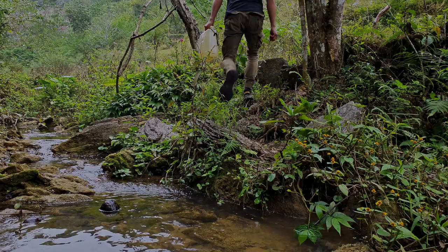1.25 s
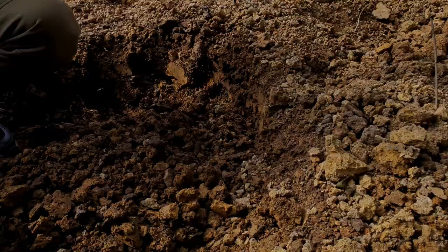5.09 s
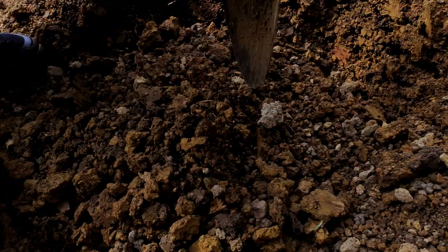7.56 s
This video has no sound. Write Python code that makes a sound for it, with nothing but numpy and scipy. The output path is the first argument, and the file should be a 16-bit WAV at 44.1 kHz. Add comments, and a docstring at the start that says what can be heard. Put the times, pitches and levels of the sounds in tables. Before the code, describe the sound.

A stream trickles as someone walks through undergrowth with a knocking plastic can; then a pole crunches into gritty ground six times.

```python
"""Water trickles close by, briefly over a deep drone, as someone carries an empty plastic can up a stream
bank: feet thump, leaves brush past, the hollow can knocks and a far bird whistles.
Then, on a quiet dry slope, a wooden pole is jabbed six times into stony soil: grit crunches, stones
crack and ring the wood, crumbs trickle back. Light wind rumbles on the microphone in both places."""
import sys
import numpy as np
from scipy import signal
from scipy.fft import rfft, irfft
from scipy.io import wavfile

SR = 44100
rng = np.random.default_rng(int(sys.argv[2]) if len(sys.argv) > 2 else 0)


def pcm_store(signal):
    """Save signal as 16-bit PCM."""
    levels = np.round(np.clip(np.atleast_2d(signal), -1, 1) * 32767)
    wavfile.write(sys.argv[1], SR, levels.astype(np.int16).T)


N = 387198
TIME = np.arange(N) / SR
BANK_END_S = 5.16

# Strokes of the pole. Each row: start and push length in seconds; grit, thud, left over right,
# first contact and caving in dB; settling time of the soil in seconds.
JABS = [(5.311, 0.026, -33.5, -37, -0.5, -25.5, -53, 0.11),
        (6.127, 0.032, -34.5, -35, 4.5, -24.5, -53.5, 0.24),
        (7.02, 0.043, -35.5, -34.5, 4, -36.5, -49, 0.092), (7.801, 0.038, -40, -45.5, 13, -20.5, -39, .008),
        (8.175, .041, -39, -44, 3, -30.5, -32, 0.0054), (8.521, 0.033, -38.5, -44, 1, -44, -41.5, .01)]
# The sharp edge of a crack. Each row: frequency in Hz, level in dB.
EDGE_SPECTRUM = [(2000, -22), (5000, -3), (9000, -0.5), (13000, 1), (16000, -11)]
# Wind on the microphone. Each row: frequency in Hz, level in dB.
WIND_SPECTRUM = [(22, -15.5), (46, -8.5), (75, -2), (110, -14.5), (180, -28), (400, -45), (1500, -68.5)]


def from_db(db):
    """Decibels to gain."""
    return 10 ** (np.asarray(db) / 20)


def rms_one(x):
    """Scale to unit power."""
    return x / np.sqrt(np.mean(x ** 2) + 1e-20)


def level(rows):
    """Gain over time from rows of seconds and dB."""
    return from_db(np.interp(TIME, *np.transpose(rows)))


def until(end):
    """Full gain, then a quick fade that closes at `end` seconds."""
    return np.clip((end - TIME) / .006, 0, 1)


def panned(db):
    """Left and right gains, `db` apart."""
    return from_db([[db / 2], [-db / 2]])


def response(points, size=4096):
    """Causal impulse response from rows of Hz and dB, by folding the cepstrum."""
    hz, db = np.transpose(points)
    log_hz = np.log(np.fft.rfftfreq(size, 1 / SR) + 1)
    log_gain = np.log(from_db(np.interp(log_hz, np.log(hz), db)))
    cepstrum = irfft(log_gain)[:size // 2]
    cepstrum[1:] *= 2
    return irfft(np.exp(rfft(cepstrum, size)))


def through(x, impulse):
    """Filter along time."""
    return signal.oaconvolve(np.atleast_2d(x), impulse[None], axes=1)[:, :N]


def colour(x, spectrum):
    """Shape white input by a spectrum, keeping its power."""
    impulse = response(spectrum)
    return through(x, impulse / np.linalg.norm(impulse))


def stereo_noise():
    """Noise that reaches both sides of the microphone alike in the bass, unrelated in the treble."""
    # Stereo width. Each row: frequency in Hz, side over mid in dB.
    width = [(50, -3.5), (200, -8.5), (500, -2.5), (1500, 1.5), (4000, -1), (8000, 1), (16000, 1.5)]
    mid, side = rng.standard_normal((2, N))
    return rms_one(mid + through(side, response(width)) * [[1], [-1]])


def drift(per_s):
    """Random wander with a spread near one."""
    knots = rng.standard_normal(N // 40)
    return np.interp(TIME * per_s, np.arange(len(knots)), knots)


def burst(start, hold, t60, rise):
    """Envelope that rises, holds and dies away; times in seconds."""
    out, first = np.zeros(N), int(start * SR)
    t = TIME[:min(N - first, SR // 2)]
    out[first:first + len(t)] = (1 - np.exp(-t / rise)) * from_db(-60 * np.maximum(t - hold, 0) / t60)
    return out


def swells(rows, fall_ratio):
    """Gain of overlapping swells, each taking `fall_ratio` times as long to fall as to rise."""
    power = np.zeros(N)
    for peak, db, width in rows:
        away = np.maximum(peak - TIME, (TIME - peak) / fall_ratio) / width
        power += (from_db(db) * np.exp(-np.minimum(away, 20))) ** 2
    return np.sqrt(power)


def ring(x, hz, t60):
    """A mode that a unit click sets ringing at height one."""
    radius, angle = from_db(-60 / (t60 * SR)), 2 * np.pi * hz / SR
    return signal.lfilter([0, np.sin(angle)], [1, -2 * radius * np.cos(angle), radius ** 2], x + 1e-18)


def grains(per_s, spread_db, grain_s, smooth):
    """Tiny fractures of uneven size, each a short puff of noise, over a smooth share of friction."""
    sizes = from_db(spread_db * np.minimum(rng.exponential(1, N), 4))
    born = rng.random(N) < per_s / SR
    energy = signal.lfilter([1], [1, -np.exp(-1 / (grain_s * SR))], (sizes * born) ** 2 + 1e-18)
    return rms_one(stereo_noise() * np.sqrt(energy / energy.mean() + smooth))


def pings(span, per_s, spectrum, cycles, glide, spread_db, pan_spread_db):
    """Small bodies ring briefly at random times and pitches; unit power within the span."""
    out, (start, end) = np.zeros((2, N + SR)), span
    pitches, levels = np.transpose(spectrum)
    draws = rng.random((4000, 5))[:int(per_s * (end - start))]
    for when, pitch, size, side, damping in draws:
        hz = pitches[0] * (pitches[-1] / pitches[0]) ** pitch
        t60 = cycles * (.5 + damping) / hz
        t = TIME[:int(min(t60, .5) * SR)]
        first = int((start + when * (end - start)) * SR)
        db = np.interp(hz, pitches, levels) + spread_db * size ** 2 - 60 * t / t60
        swing = np.sin(2 * np.pi * hz * t * (1 + glide * t / t60)) * (1 - np.exp(-t * hz * 2))
        out[:, first:first + len(t)] += panned(pan_spread_db * (2 * side - 1)) * from_db(db) * swing
    return rms_one(out[:, :N]) * np.sqrt((end - start) * SR / N)


def knocks(rows, cycles, rattle_db):
    """Each contact swings for a few cycles and leaves a short rattle around the same pitch."""
    out, noise = np.zeros((2, N + SR)), stereo_noise()
    t = TIME[:SR // 4]
    for k, (start, db, hz, t60, pan_db) in enumerate(rows):
        swing = np.sin(2 * np.pi * hz * t) * from_db(-60 * t * hz / cycles)
        band = signal.butter(2, [hz * 0.49, hz * 1.27], "band", fs=SR, output="sos")
        rattle = rms_one(signal.sosfilt(band, noise[:, k * len(t):(k + 1) * len(t)]))
        rattle *= from_db(-60 * t / t60)
        sound = from_db(db) * panned(pan_db) * (swing + from_db(rattle_db) * rattle)
        # the quieter side hears it slightly later
        for side, arrival in enumerate((start, start + pan_db * 4e-5)):
            first = int(arrival * SR)
            out[side, first:first + len(t)] += sound[side]
    return out[:, :N]


def pole():
    """The tip crushes grit and clinks pebbles; the soil packs, stops it with a thump and caves in."""
    # Stones cracking under the tip, and pebbles ticking after the stroke.
    # Each row: start in seconds, level in dB, t60 in seconds, edge in dB.
    cracks_and_ticks = [(5.333, -19.5, 0.052, -31), (6.158, -29.5, 0.044, -19), (6.183, -46, .012, 5),
                        (6.249, -54, .008, 11), (6.342, -58.5, 0.015, 21), (7.041, -23.5, 0.039, 6),
                        (7.057, -19.5, 0.042, -15), (7.824, -19.5, 0.037, 4), (8.201, -30.5, .014, 10),
                        (8.213, -28.5, 0.028, -22), (8.538, -38, 0.059, 9), (8.68, -42, 0.026, -12)]
    # The tip grazing the ground. Each row: start and length in seconds, grit level in dB.
    grazes = [(8.276, 0.0072, -44.5), (8.501, 0.01, -52.5)]
    # Resonances of the pole and of packed soil. Each row: pitch in Hz, t60 in seconds, level in dB.
    wood_modes = [(544, 0.012, -16), (1340, 0.012, -16), (1610, 0.021, -14.5), (2310, 0.022, -12),
                  (3130, 0.032, -13.5), (5260, 0.033, -22)]
    ground_modes = [(117, 0.16, -3.5), (210, 0.06, 5), (265, 0.048, 3), (530, 0.017, 4)]
    # Grit, pebbles, soil packing and soil caving in. Each row: frequency in Hz, level in dB.
    grit_spectrum = [(150, -7), (400, 2), (800, -1.5), (1400, -1.5), (2500, 5), (4800, 4), (6500, -1),
                     (9000, 1.5), (13000, -1.5), (16000, -11.5)]
    pebble_spectrum = [(450, -12), (1000, -3), (2000, 8), (4000, -9), (9000, 5)]
    thud_spectrum = [(25, -9.5), (60, -32), (130, -18.5), (280, 4), (500, -13), (900, -11), (2500, -19.5)]
    caving_spectrum = [(90, -18.5), (180, 1.5), (350, -2.5), (600, 0), (900, -11), (2000, -33)]
    crush, contacts = np.zeros((2, N)), []
    packing, stops, caving, cracks, edges = np.zeros((5, N))
    for start, push, grit_db, thud_db, pan_db, contact_db, caving_db, _ in JABS:
        # the soil packs ever tighter, so crunch and thud grow along the push
        to_go = 1 - np.clip((TIME - start) / push, 0, 1)
        crush += from_db(grit_db - 3 * to_go) * panned(pan_db) * burst(start, push, t60=.051, rise=.0015)
        packing += from_db(thud_db + 1.05 - 2.3 * to_go) * burst(start, push + .0011, t60=.13, rise=.002)
        stops[int((start + push) * SR)] = from_db(thud_db)
        caving += from_db(caving_db) * burst(start + .8 * push, hold=.012, t60=.1, rise=.003)
        contacts.append((start + .002, contact_db, .021, -6.5))   # one more crack as the crust breaks
    for start, length, grit_db in grazes:
        crush += from_db(grit_db) * burst(start, length, t60=.062, rise=.0026)
    for start, db, t60, edge_db in contacts + list(cracks_and_ticks):
        crack = from_db(db) * burst(start, 0, t60, rise=.0006)
        cracks += crack
        edges += from_db(edge_db) * crack
    force = crush * grains(per_s=1400, spread_db=3.5, grain_s=.0003, smooth=.19)
    force += from_db(-6.5) * cracks * stereo_noise()
    clinks = pings((BANK_END_S, N / SR), 900, pebble_spectrum,
                   cycles=59, glide=0, spread_db=12, pan_spread_db=1)
    # the same force rings the wood; each mode is scaled to its share of the power
    wood = sum(from_db(db) * ring(force, hz, t60) * np.sqrt(4 * np.log(1000) / (t60 * SR))
               for hz, t60, db in wood_modes)
    crunch = from_db(3) * colour(force, grit_spectrum) + colour(edges * stereo_noise(), EDGE_SPECTRUM)
    crunch += wood + from_db(-6.5) * (crush + cracks) * clinks
    thump = sum(from_db(db) * ring(stops, hz, t60) for hz, t60, db in ground_modes)
    earth = packing * colour(stereo_noise(), thud_spectrum)
    earth += caving * colour(stereo_noise(), caving_spectrum)
    return crunch + slope_scatter(crunch, t60=.07, wet_db=-19) + earth + thump


def slope_scatter(x, t60, wet_db):
    """The rough slope throws a thin, short tail back to the microphone."""
    tail = rng.standard_normal((2, SR // 2)) * from_db(-60 * TIME[:SR // 2] / t60)
    tail /= np.linalg.norm(tail, axis=1, keepdims=True)
    return from_db(wet_db) * signal.oaconvolve(x, tail, axes=1)[:, :N]


def spill(db, t60):
    """Gain of soil sliding after a stroke: it halves within the settling time, then slowly rests."""
    out = np.zeros(N)
    for start, push, *_, settling in JABS:
        first = int((start + push) * SR)
        t = TIME[:N - first]
        out[first:] = from_db(db - 60 * t / t60) / (1 + t / settling)
    return out


def crumbs():
    """Loosened soil trickles back into the hole: fine grains, dry ticks and a few clods."""
    # Trickling soil. Each row: frequency in Hz, level in dB.
    crumb_spectrum = [(200, 10.5), (600, 0.5), (1800, 0), (4000, -1), (7000, -2), (10000, 0.5), (16000, 0)]
    # Soil levered loose between strokes. Each row: peak time in seconds, level in dB, width in seconds.
    slides = [(6.56, -51, 0.043), (6.73, -62.5, 0.051), (7.47, -69, 0.092), (7.94, -51, 0.031),
              (8.28, -52.5, 0.038), (8.63, -44, 0.03), (8.67, -41.5, 0.013)]
    # Clods and pebbles settling. Each row: start in seconds, level in dB, pitch in Hz,
    # rattle t60 in seconds, left over right in dB.
    clods = [(5.514, -49, 1800, 0.079, 4), (5.567, -55, 1875, 0.11, 1), (6.40, -53.5, 780, 0.26, 5),
             (6.49, -52, 1090, 0.44, 6), (6.66, -56.5, 71, 0.08, -45), (8.254, -35.5, 1450, 0.04, -1),
             (8.495, -38, 2100, 0.056, 9), (8.682, -42, 2030, 0.1, -1.5)]
    trickle = colour(grains(per_s=300, spread_db=2.5, grain_s=.0005, smooth=1.5), crumb_spectrum)
    ticks = colour(grains(per_s=24, spread_db=12.5, grain_s=.0008, smooth=0), EDGE_SPECTRUM)
    sliding = np.hypot(spill(db=-54, t60=5), swells(slides, fall_ratio=.81)) * from_db(3 * drift(45))
    soil = sliding * (from_db(-2) * trickle + from_db(-14.5) * ticks)
    return soil + knocks(clods, cycles=6.3, rattle_db=-9)


def walker():
    """Heel and sole thump on the bank, the hollow can bumps along and stones knock underfoot."""
    # Footfalls. Each row: start in seconds, level in dB, rattle t60 in seconds.
    steps = [(0.573, -19.5, 0.13), (1.135, -34.5, .18), (1.853, -24, 0.2), (2.799, -30.5, 0.21),
             (3.445, -33.5, 0.11), (3.538, -36.5, 0.21), (5.115, -37.5, 0.16)]
    # The can against the leg. Each row: start in seconds, level in dB, rattle t60 in seconds,
    # left over right in dB.
    bumps = [(.171, -21.5, 0.07, 5), (0.2, -26.5, .03, -3.5), (.57, -26.5, 0.44, -3),
             (.622, -18.5, 0.018, -3), (0.978, -34, 0.069, 7)]
    # Resonances of the can. Each row: pitch in Hz, level in dB.
    can_modes = [(530, -1), (1520, 0)]
    # Loose stones and sticks. Each row: start in seconds, level in dB, pitch in Hz,
    # rattle t60 in seconds, left over right in dB.
    stones = [(.329, -7, 2420, 0.0039, 2), (.785, -25, 1010, 0.29, 3.5), (2.533, -33, 910, 0.16, 1),
              (2.8, -18, 1280, 0.05, -1), (2.82, -18, 1160, 0.029, 2.5), (3.651, -28, 1220, 0.075, -1.5),
              (3.803, -33.5, 1870, 0.044, 14.5), (4.165, -34.5, 870, 0.088, 0),
              (4.229, -32, 1010, 0.033, -5), (5.134, -40, 1115, 0.096, 12)]
    heel_hz, sole_hz, sole_delay_s = 248.4, 274, .016
    heels = [(start, db, heel_hz, t60, 0) for start, db, t60 in steps]
    soles = [(start + sole_delay_s, db - 4.5, sole_hz, t60, 0) for start, db, t60 in steps]
    can = [(start, db + mode_db, hz, t60, pan_db)
           for start, db, t60, pan_db in bumps for hz, mode_db in can_modes]
    return (knocks(heels + soles, cycles=6, rattle_db=-6.5)
            + knocks(can, cycles=11, rattle_db=-8.5)
            + knocks(stones, cycles=6.5, rattle_db=-8))


def undergrowth():
    """Leaves and grass slide over clothes and can, their edges flicking; now and then a twig snaps."""
    # Branches sweeping past. Each row: peak time in seconds, level in dB, width in seconds.
    branches = [(.1, -47.5, 0.49), (.36, -47, 0.23), (.59, -42, 0.045), (.795, -28.5, 0.039),
                (.95, -46, 0.21), (1.14, -42.5, 0.05), (1.28, -49.5, 0.021), (1.68, -46.5, 0.14),
                (2.1, -46, 0.1), (2.42, -51, 0.041), (2.83, -38, 0.091)]
    # Wading away through tall grass, and the share of fine blades. Each row: time in seconds, level in dB.
    wading = [(3.0, -64), (3.15, -52), (3.31, -41), (3.43, -44), (3.8, -40), (3.97, -45.5), (4.27, -46.5),
              (4.45, -52), (5.14, -59)]
    grass_share = [(2.3, -23), (2.8, -2), (3.7, 3.5), (4.7, -4)]
    # Twigs snapping. Each row: start in seconds, level in dB, t60 in seconds.
    twigs = [(1.135, -18.5, 0.017), (1.266, -25, 0.012), (1.766, -33, 0.057), (2.531, -31, 0.03),
             (2.801, -27.5, 0.026), (2.818, -14.5, 0.0057)]
    # Rustling leaves and hissing blades. Each row: frequency in Hz, level in dB.
    leaf_spectrum = [(150, 1.5), (500, -11), (1100, -4), (2500, -5.5), (5000, -5), (7000, -8.5),
                     (9000, -1.5), (12500, -2), (16000, -7)]
    grass_spectrum = [(6000, -30.5), (9000, -13.5), (12000, 7.5), (16000, 1)]
    brushing = np.hypot(swells(branches, fall_ratio=1.31), level(wading) * from_db(2 * drift(16)))
    rustle = from_db(.5) * grains(per_s=1800, spread_db=8.5, grain_s=.0024, smooth=1)
    flicks = from_db(-7.5) * grains(per_s=82, spread_db=2.5, grain_s=.0039, smooth=0)
    rubbing = brushing * (rustle + flicks)
    snaps = sum(from_db(db) * burst(start, 0, t60, rise=.00064) for start, db, t60 in twigs)
    blades = level(grass_share) * brushing * grains(per_s=250, spread_db=3, grain_s=.0007, smooth=.9)
    return colour(rubbing + snaps * stereo_noise(), leaf_spectrum) + colour(blades, grass_spectrum)


def stream():
    """Water runs over stones: a wash, bubbles rising in pitch as they surface, a few larger gurgles."""
    # The stream, close at first and then further off. Each row: time in seconds, level in dB.
    flow = [(0, -44), (.2, -47.5), (.35, -38.5), (.53, -45), (.97, -46), (1.02, -51), (2.4, -52),
            (3.5, -48.5), (4.0, -53.5), (5.16, -51.5)]
    # Wash, bubbles and gurgles. Each row: frequency in Hz, level in dB.
    wash_spectrum = [(60, -2.5), (150, -1), (340, -4), (560, -4.5), (850, -14), (1600, -11.5), (3400, -15),
                     (5000, -18), (7000, -23), (16000, -34.5)]
    bubble_spectrum = [(270, 4.5), (400, -5), (600, -17.5), (900, -1), (1700, -9), (3000, 3.5), (5000, 3.5)]
    gurgle_spectrum = [(450, -5.5), (1000, 3.5), (2400, -3)]
    span = (0, BANK_END_S)
    wash = from_db(.13) * colour(stereo_noise(), wash_spectrum)
    bubbles = pings(span, 600, bubble_spectrum, cycles=40, glide=.15, spread_db=14, pan_spread_db=18.5)
    gurgles = pings(span, 40, gurgle_spectrum, cycles=100, glide=.12, spread_db=13.5, pan_spread_db=10)
    return level(flow) * (wash + from_db(-7) * bubbles + from_db(-13.5) * gurgles)


def drone():
    """A deep wavering tone with some rumble around it fills the first second."""
    phase = 2 * np.pi * np.cumsum(43.1 + .46 * drift(3.9)) / SR
    tone = from_db(-39 + 3.6 * drift(45)) * np.sin(phase)
    return until(.99) * (tone + from_db(-49) * colour(stereo_noise(), WIND_SPECTRUM))


def rumble():
    """Gusts buffet the microphone, and a low shudder follows each stroke of the pole."""
    # Gusts. Each row: peak time in seconds, level in dB, width in seconds.
    gusts = [(.6, -32, .03), (1.18, -55, .08), (1.88, -49.5, 0.064), (2.87, -48.5, .11), (4.14, -48.5, .09),
             (4.63, -47.5, .13), (5.08, -42.5, 0.029), (5.7, -65, .05), (6.235, -44.5, 0.051),
             (6.36, -59.5, 0.065), (6.9, -45.5, 0.075), (7.08, -43.5, 0.09), (7.63, -69, 0.11),
             (8.0, -63, .05), (8.5, -49.5, 0.023), (8.63, -58, .05), (8.77, -48, 0.084)]
    shudder = sum(from_db(thud_db - 10) * burst(start, push, t60=.33, rise=.01)
                  for start, push, _, thud_db, *_ in JABS)
    buffeting = np.hypot(swells(gusts, fall_ratio=1), shudder)
    return from_db(5.5) * buffeting * colour(stereo_noise(), WIND_SPECTRUM)


def bird():
    """Faint whistles from far off in the trees, each an unsteady arch of pitch."""
    # Whistles. Each row: start and length in seconds, first and top pitch in Hz, level in dB.
    whistles = [(1.556, 0.18, 2950, 3520, -54), (4.299, 0.14, 3110, 3490, -55)]
    out = np.zeros(N)
    for start, length, first_hz, top_hz, db in whistles:
        arch = np.sin(np.pi * np.clip((TIME - start) / length, 0, 1) ** 2)
        hz = first_hz + (top_hz - first_hz) * arch + 110 * drift(300)
        out += from_db(db) * np.sqrt(np.abs(arch)) * np.sin(2 * np.pi * np.cumsum(hz) / SR)
    return out


def still_air():
    """A faint, steady hush lies behind both places."""
    # Open air. Each row: frequency in Hz, level in dB.
    air_spectrum = [(60, 2), (150, -3), (400, -5.5), (1000, -13), (3800, -22), (7000, -24.5), (10000, -17),
                    (16000, -24.5)]
    return from_db(-75.5) * colour(stereo_noise(), air_spectrum)


def scene():
    """The stream bank, then the dry slope, with wind and still air throughout."""
    bank = until(BANK_END_S) * (stream() + undergrowth() + walker() + bird())
    return bank + still_air() + drone() + pole() + crumbs() + rumble()


def record(dry):
    """The microphone's two sides differ a little in colour; the top is cut above 16.1 kHz."""
    # Lean of the microphone. Each row: frequency in Hz, left over right in dB.
    lean = [(50, -1.5), (150, -1), (500, 1.5), (1500, 3), (4500, 2.5), (8000, -0.5), (15000, -2)]
    left = through(dry[0], response([(hz, db / 2) for hz, db in lean]))
    right = through(dry[1], response([(hz, -db / 2) for hz, db in lean]))
    top_cut = signal.ellip(10, .2, 70, 16100, fs=SR, output="sos")
    return signal.sosfilt(top_cut, np.vstack([left, right]))


dry = scene()
out = record(dry)
pcm_store(out)
```